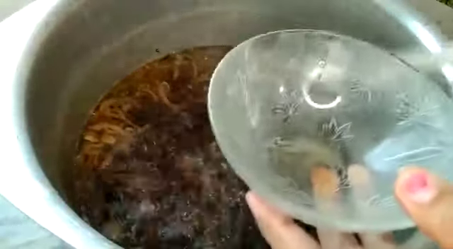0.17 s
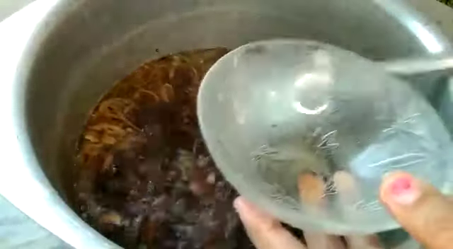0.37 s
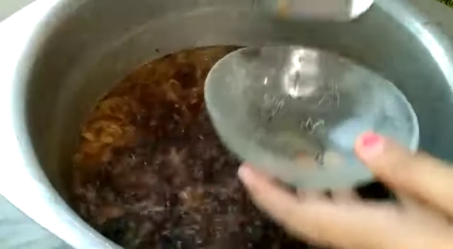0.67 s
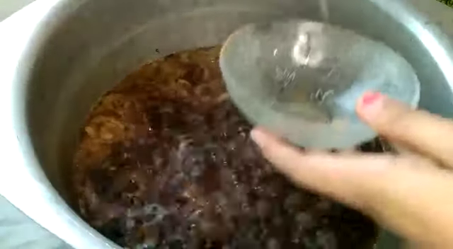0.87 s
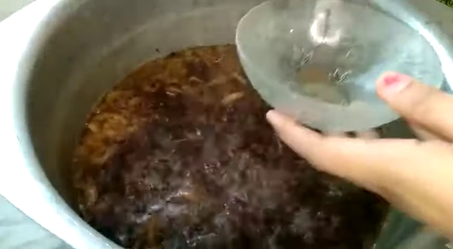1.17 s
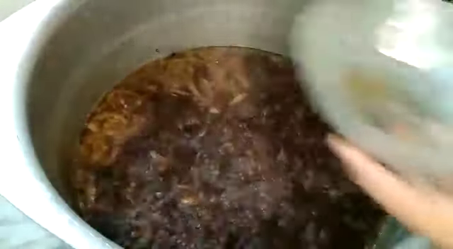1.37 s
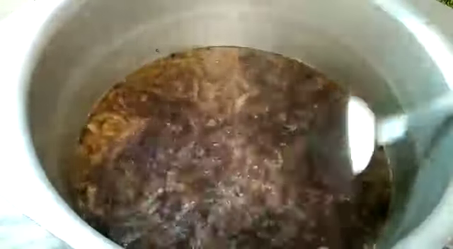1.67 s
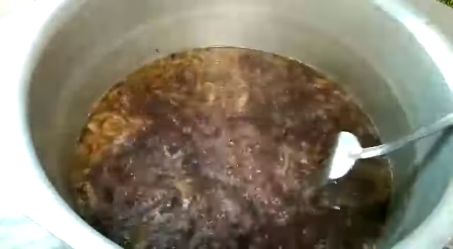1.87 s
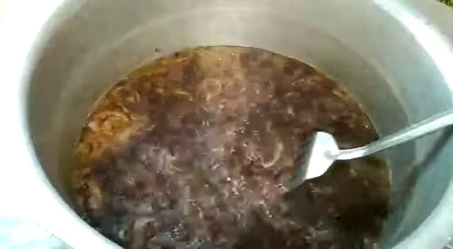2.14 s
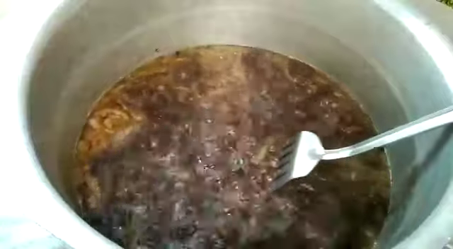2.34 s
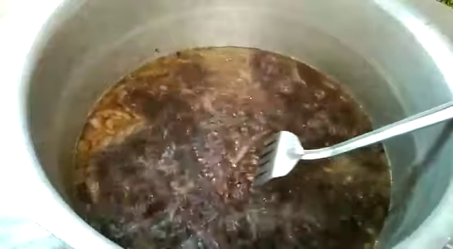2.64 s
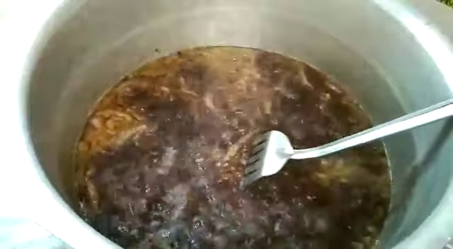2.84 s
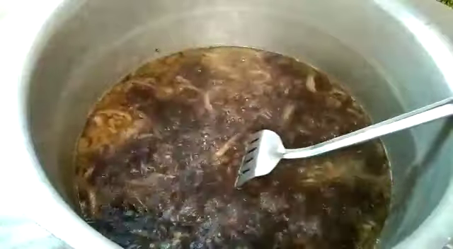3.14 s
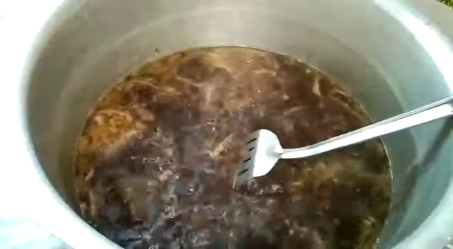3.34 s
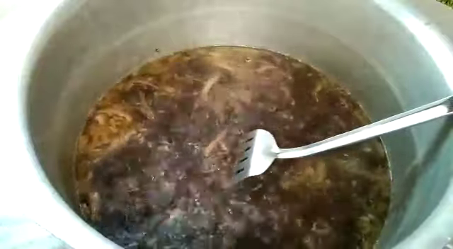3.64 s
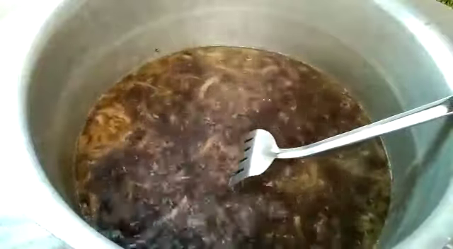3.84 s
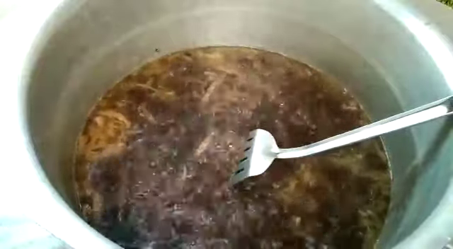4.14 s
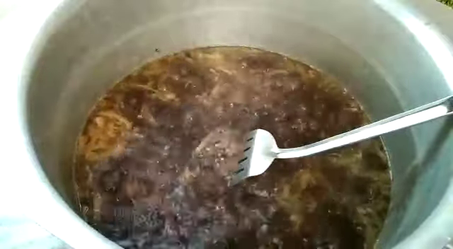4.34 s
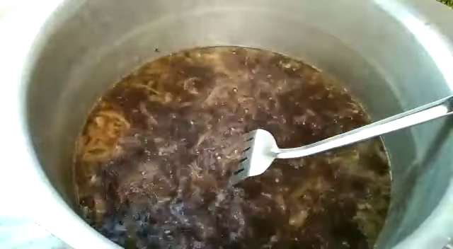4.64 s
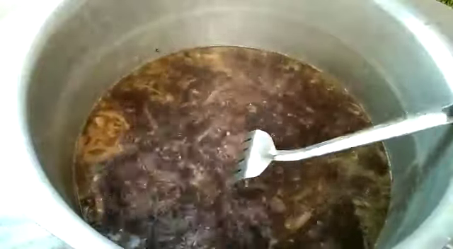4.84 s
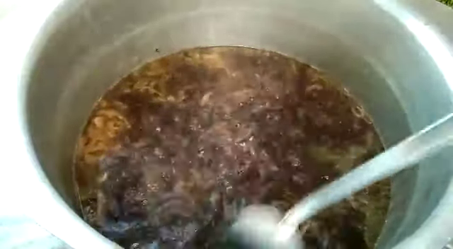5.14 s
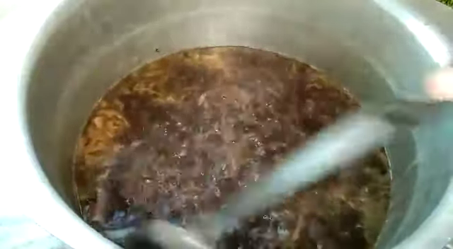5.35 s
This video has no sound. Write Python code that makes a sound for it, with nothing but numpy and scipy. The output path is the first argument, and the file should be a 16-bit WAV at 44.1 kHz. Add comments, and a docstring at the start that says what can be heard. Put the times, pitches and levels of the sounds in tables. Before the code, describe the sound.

Close metallic knocks and scrapes on a large bubbling pot in a hard-walled kitchen, with a dull double clack of glass between.

```python
"""A large metal pot simmers throughout in a hard-walled kitchen: bubble fizz on top, glugs and plops below.
A steel spatula, made of noise crashes and decaying modes, drops against the wall and slides into the stew.
Its strokes are random slips through resonances. Far peeps, falling sines, come early and again later.
A glass bowl lands with a double knock of noise and modes; a dull noise thump and a short hiss follow.
Last, the spatula is picked up, knocked and scraped round the pot."""
import sys
import numpy as np
from scipy import signal
from scipy.fft import rfft, irfft, next_fast_len
from scipy.io import wavfile
from scipy.ndimage import uniform_filter1d, map_coordinates

SR = 44100
rng = np.random.default_rng(int(sys.argv[2]) if len(sys.argv) > 2 else 0)


def file_out(sig):
    """Save sig as 16-bit WAV at sys.argv[1]."""
    # one column per channel
    cols = np.atleast_2d(sig).T
    # limit, then scale
    lim = np.clip(cols, -1, 1)
    pcm = np.round(lim * 32767).astype(np.int16)
    wavfile.write(sys.argv[1], SR, pcm)


N = 243025


def amp(db):
    """Decibels to gain."""
    return 10 ** (np.asarray(db) / 20)


def unit(x):
    """Scale to rms 1."""
    return x / np.sqrt(np.mean(x ** 2) + 1e-20)


def along(points, hz):
    """Interpolate (hz, value) points on a log frequency axis."""
    point_hz, values = np.transpose(points)
    return np.interp(np.log(hz + 1), np.log(point_hz + 1), values)


def curves(rows):
    """One value per sample for each column after the time."""
    time_s, *columns = np.transpose(rows)
    return [np.interp(np.arange(N) / SR, time_s, column) for column in columns]


def add(track, start_s, sound):
    """Mix a sound into the track at start_s."""
    part = track[max(round(start_s * SR), 0):][:len(sound)]
    part += sound[:len(part)]


def filtered(x, response):
    """Multiply the spectrum of x by a response of frequency."""
    size = next_fast_len(len(x) + 8192)
    hz = np.fft.rfftfreq(size, 1 / SR)
    return irfft(rfft(x, size) * response(hz), size)[:len(x)]


def coloured(x, spectrum):
    """Shape x by (hz, level_db) points, at rms 1."""
    return unit(filtered(x, lambda hz: amp(along(spectrum, hz))))


def struck(t, t60_s, rise_s):
    """Envelope of a blow: exponential rise and decay."""
    return amp(-60 * t / t60_s) * (1 - np.exp(-t / rise_s))


def bout(start_s, length_s, rise_s, t60_s):
    """Envelope that rises, holds until length_s after the start and dies away."""
    t = np.arange(N) / SR - start_s
    return np.clip(t / rise_s, 0, 1) * amp(-60 * np.maximum(t - length_s, 0) / t60_s)


def wobble(knots_per_s):
    """Smooth random curve through normally distributed knots."""
    knots = rng.standard_normal(256)
    return map_coordinates(knots, [np.arange(N) * knots_per_s / SR], mode="mirror")


def sparks(rate_per_s, spread_db):
    """Random one-sample impacts of uneven size, at rms 1."""
    hits = rng.random(N) < rate_per_s / SR
    sizes = rng.standard_normal(N) * amp(spread_db * rng.standard_normal(N))
    return unit(hits * sizes)


def bubbles(rate_per_s, centre_hz, spread, cycles, size_db):
    """Swarm of tiny ringing bubbles, each falling 60 dB in some cycles and rising a little in pitch."""
    count = int(rate_per_s * N / SR)
    when, pitch, size = rng.random((count, 3)).T[:, :, None]
    hz = centre_hz * np.exp(spread * (2 * pitch - 1))
    k = np.arange(int(min(2 * cycles / centre_hz, .08) * SR))
    age = hz * k / SR / cycles  # 1 at the 60 dB point
    rings = np.sin(2 * np.pi * cycles * age * (1 + .025 * age)) * struck(age, 1, .1)
    sizes = amp(-size_db * np.log(1 - .97 * size))
    places = (when * N).astype(int) + k
    return unit(np.bincount(places.ravel(), (sizes * rings).ravel(), N)[:N])


def sheet(x, count, t60_s, uneven_db):
    """Sound x through a crowd of uneven modes of thin sheet metal, at rms 1."""
    t = np.arange(SR // 6) / SR
    place, size, phase = rng.random((count, 3)).T[:, :, None]
    hz = 600 + 11000 * (np.arange(count)[:, None] + place) / count
    tones = amp(uneven_db * size) * np.sin(2 * np.pi * (hz * t + phase))
    answer = tones.sum(0) * amp(-60 * t / t60_s)
    return unit(signal.fftconvolve(x, answer)[:len(x)])


def ring(modes, t):
    """Decaying modes of new strengths each strike; phases wander at random, so the ring is slightly rough."""
    tones = np.zeros(len(t))
    for hz, level_db, t60_s in modes:
        strength = amp(level_db + 2 * rng.standard_normal() - 60 * t / t60_s)
        wander = np.cumsum(rng.standard_normal(len(t))) * np.sqrt(2 / SR) + rng.random()  # in cycles
        tones += strength * np.sin(2 * np.pi * (hz * t + wander))
    return tones * (1 - np.exp(-t / .0005))


def room(x, wet_db):
    """Add the echo of the hard walls, each frequency dying at its own speed."""
    # wall echo decay: hz, t60_s
    echo_decay = [(150, 0.68), (400, 0.49), (1200, 0.49), (3000, 0.42), (7000, 0.37), (14000, 0.5)]
    hz, t, z = signal.stft(rng.standard_normal(SR), SR, nperseg=256)
    fade = amp(-60 * t / along(echo_decay, hz)[:, None]) * (1 - np.exp(-t / 0.001))
    tail = signal.istft(z * fade, SR, nperseg=256)[1]
    return x + amp(wet_db) * signal.fftconvolve(x, tail / np.linalg.norm(tail))[:len(x)]


def spatula():
    """Steel on the pot: each contact is a crash of dense short modes, then the ring of pot and blade."""
    # contacts: start_s, level_db, body_db and bright_db (tilt before offsets), spot_hz (favoured by the spot)
    clanks = [(0.027, -42.5, -22, -31, 2320), (0.103, -37.5, -4, 3, 1110), (0.207, -38, -27, -12, 2050),
              (1.617, -53.5, 5, -9, 1293), (1.69, -11, -9, -6.5, 4310), (1.699, -27.5, -17.5, -2, 2690),
              (1.784, -12.5, -18.5, -16.5, 2310), (1.802, -16, -10.5, -9, 6530),
              (2.068, -25.5, -8.5, -17.5, 4300), (2.613, -44, -1, -1.5, 5000),
              (2.62, -37.5, -7, -2.5, 5100), (2.752, -44, -36, 5, 4970), (4.371, -50.5, -40, 7.5, 3540),
              (5.264, -26, -14, -7.5, 8260), (5.306, -11.5, -21, -8.5, 8200),
              (5.376, -17.5, -20.5, -9.5, 3075), (5.413, -17, -23.5, -1.5, 2770),
              (5.442, -13.5, -45, -14.5, 3000), (5.451, -13, -23.5, -8, 7400),
              (5.483, -11, -42, -7.5, 2880), (5.503, -16, -37, -6, 7230)]
    # modes of pot and blade: hz, level_db (before tilt), t60_s
    metal_modes = [(296, 2, .75), (345, -4, .65), (470, -6, .45), (760, -8, .5), (1281, -8, .42),
                   (1338, -3, .47), (2080, -13, .5), (2350, -3, .33), (2447, -4, .33), (2647, 0, .36),
                   (2785, -2, .33), (2975, -6, .3), (3704, -8, .35), (3965, -5, .35), (4290, -8, .25),
                   (4554, -9, .3), (4890, -8, .2), (5900, -9, .3), (6245, -8, .2), (6955, -9, .35),
                   (7185, -7, .3), (7671, -3, .15)]
    # crash colour before tilt: hz, level_db
    clang_colour = [(90, -55.5), (150, -25.5), (245, -26), (295, -4), (560, -5.5), (740, -11.5), (870, -14),
                    (1320, -7), (1730, -14), (2420, -3), (3250, -3), (4150, -2.5), (5250, -4.5),
                    (7600, -0.5), (9300, -9), (11000, -21), (15600, -25.5)]
    out, t = np.zeros(N), np.arange(SR * 3 // 4) / SR
    for start_s, level_db, body_db, bright_db, spot_hz in clanks:
        # a heavy blow moves the whole wall, a sharp corner brings out the treble
        tilt = [(600, body_db + 11.0), (2200, 0), (4500, 0), (8000, bright_db + 7.5)]

        def touch_db(hz):
            """Tilt plus the peak of the point of contact."""
            return along(tilt, hz) + 9 / (1 + ((hz / spot_hz - 1) / 0.12) ** 2)

        chatter = rng.standard_normal(len(t))
        dense = sheet(chatter, count=40, t60_s=0.02, uneven_db=11.5)
        crash = coloured(chatter + 1.1 * dense, clang_colour)
        crash = filtered(crash, lambda hz: amp(touch_db(hz)))
        # the blade snaps at once, the heavy wall swells and fades more slowly
        wall = filtered(crash, lambda hz: 1 / (1 + (hz / 1600) ** 4))
        snap = (crash - wall) * struck(t, t60_s=0.02, rise_s=0.00083)
        swell = amp(-4.5) * wall * struck(t, t60_s=0.19, rise_s=0.001)
        modes = [(hz, mode_db + touch_db(hz), t60_s) for hz, mode_db, t60_s in metal_modes]
        contact = room(snap + swell, wet_db=2.5) + amp(-25) * ring(modes, t)
        add(out, start_s, amp(level_db + 3) * contact)
    return out


def scraping():
    """The blade sticks and slips: the wall rumbles, the stirred stew gurgles, the edge rasps in resonances."""
    # strokes along the pot: start_s, length_s, wall_db, edge_db
    strokes = [(0.0, 0.014, -37.5, -48.5), (0.083, 0.16, -41.5, -46.5), (1.667, 0.028, -27.5, -29.5),
               (1.873, .11, -35.5, -33.5), (2.011, 0.04, -42, -39.5), (2.047, 0.15, -34.5, -38.5),
               (2.314, 0.056, -45, -54), (2.429, 0.066, -41.5, -52.5), (2.567, 0.14, -38.5, -51.5),
               (2.771, 0.018, -43.5, -44), (5.327, .065, -49, -28), (5.387, .115, -34, -16)]
    # colour of wall and stew: hz, level_db
    rumble_colour = [(100, -29), (200, -15.5), (290, 0), (350, 1), (460, 0.5), (610, -28.5), (770, 2.5),
                     (880, -18.5), (1100, -22.5), (1380, -4), (1750, -34), (2400, -37), (4000, -65.5)]
    # colour of the slips: hz, level_db
    rasp_colour = [(300, -25.5), (450, 1), (620, -15.5), (780, 2.5), (900, -4.5), (1250, -0.5),
                   (1750, -4.5), (2150, -21), (2700, 5), (3300, -21.5), (4300, 1.5), (7800, -1),
                   (10000, -28), (15500, -33)]
    # resonances excited by the edge: centre_hz, width_hz, level_db
    edge_modes = [(780, 25, -9), (1255, 35, -4), (2735, 50, 2), (2810, 50, 1), (3800, 70, -3),
                  (4290, 50, -7), (4778, 45, -6), (5600, 60, -9), (6430, 140, -8), (7185, 80, -2),
                  (7550, 60, -7)]
    wall, edge = np.zeros(N), np.zeros(N)
    for start_s, length_s, wall_db, edge_db in strokes:
        contact = bout(start_s, length_s, rise_s=.012, t60_s=0.18)  # takes hold, lets go
        wall += contact * amp(wall_db)
        edge += contact * amp(edge_db)

    def resonances(hz):
        """Sum of the band-pass responses."""
        return sum(amp(level_db) * 1j * hz * width_hz / (centre_hz ** 2 - hz * hz + 1j * hz * width_hz)
                   for centre_hz, width_hz, level_db in edge_modes)

    slips = sheet(sparks(rate_per_s=500, spread_db=0), count=64, t60_s=0.087, uneven_db=18)
    squeal = unit(filtered(sparks(rate_per_s=3000, spread_db=0), resonances))
    rasp = amp(-9.5) * coloured(slips, rasp_colour) + amp(-11.5) * squeal
    rumble = amp(-11) * coloured(sparks(rate_per_s=1600, spread_db=-3.5), rumble_colour)
    stew = bubbles(rate_per_s=170, centre_hz=701.5, spread=.9, cycles=38, size_db=6.5)
    gurgle = amp(-9.5) * coloured(stew, rumble_colour)
    return room(edge * rasp + wall * (rumble + gurgle), wet_db=-10)


def bowl():
    """Thick glass meets the counter: a dull clack, a tiny high ring, and a brief hum of the counter."""
    # landings, each with a bounce: start_s, level_db
    knocks = [(3.888, -14.5), (3.897, -14.5), (3.974, -12.5), (3.982, -16)]
    # clack colour: hz, level_db
    thud_colour = [(60, -57), (110, -28.5), (150, -11.5), (200, -18), (380, -6), (600, -13), (800, -5.5),
                   (1250, 4), (1650, -6), (2000, -10), (3000, -14), (4100, -40.5), (5300, -28.5),
                   (8000, -33.5), (11000, -53)]
    # glass modes: hz, level_db, t60_s
    glass_modes = [(9318, 0, .06), (11750, -16, .07), (13530, -19, .06)]
    out, t = np.zeros(N), np.arange(SR) / SR
    for start_s, level_db in knocks:
        clack = coloured(rng.standard_normal(SR), thud_colour) * struck(t, t60_s=0.044, rise_s=0.00052)
        ting = amp(-10) * room(ring(glass_modes, t), wet_db=-7.5)
        counter = amp(-22.5) * np.sin(2 * np.pi * 149 * t) * struck(t, t60_s=.5, rise_s=.004)
        add(out, start_s, amp(level_db) * (room(clack, wet_db=3.5) + ting + counter))
    return out


def thump():
    """Something heavier settles beside the bowl: a dull, slow burst of coloured noise."""
    # thump colour: hz, level_db
    thump_colour = [(90, -25), (200, -11.5), (300, 0.5), (470, -2.5), (800, -12), (1150, -8.5),
                    (1900, -21.5), (3000, -18), (4200, -31), (6300, -23), (9000, -34.5), (15000, -61.5)]
    out, t = np.zeros(N), np.arange(SR) / SR
    push = coloured(rng.standard_normal(SR), thump_colour) * struck(t, t60_s=0.22, rise_s=0.0015)
    add(out, 4.112, amp(-26.5) * room(push, wet_db=4.0))
    return out


def simmer():
    """Steam pockets glug at the bottom in bouts while tiny bubbles fizz and tinkle on top."""
    # bouts of rising steam pockets: start_s, length_s, level_db
    glug_bouts = [(0.0, 0.16, -46.5), (0.382, 0.053, -52.5), (1.124, 0.14, -54), (1.695, 0.3, -52),
                  (2.88, 0.51, -50.5), (4.34, .1, -52), (4.615, 0.071, -47), (5.006, 0.065, -53.5),
                  (5.248, 0.078, -49.5)]
    # glug colour: hz, level_db
    glug_colour = [(15, -48), (25, -8), (43, -12.5), (66, -6), (86, 7.5), (108, -7), (146, 3), (174, -14),
                   (214, -7.5), (251, -33.5), (400, -36), (520, -60.5), (880, -120)]
    # fizz strength before sway: time_s, level_db
    fizzing = [(0.0, -57), (0.15, -54), (0.43, -66.5), (0.6, -58.5), (1.35, -61.5), (1.8, -53),
               (2.3, -52.5), (3.0, -57.5), (4.4, -52), (4.97, -59), (5.5, -53)]
    # froth colour: hz, level_db
    fizz_colour = [(1470, -42.5), (2500, -30.5), (2790, -23.5), (4160, -18), (5160, -12), (5800, -36),
                   (7480, 6), (8080, -1.5), (9500, 9.5), (14900, -2), (15800, -10.5)]
    steam = amp(-64.5)  # murmur of the boil between bouts
    for start_s, length_s, level_db in glug_bouts:
        steam = steam + amp(level_db - 2.5) * bout(start_s, length_s, rise_s=.035, t60_s=0.44)
    glug = steam * coloured(sparks(rate_per_s=440, spread_db=-1.0), glug_colour)
    fizz_db = curves(fizzing)[0] + 3.16 * wobble(knots_per_s=8.2)  # the froth comes and goes
    froth = coloured(rng.standard_normal(N) + 0.75 * sparks(rate_per_s=1300, spread_db=6), fizz_colour)
    tinkle = bubbles(rate_per_s=110, centre_hz=7800, spread=.13, cycles=130, size_db=4)
    tinkle = unit(room(tinkle, wet_db=2))
    pips = bubbles(rate_per_s=20, centre_hz=5900, spread=.17, cycles=110, size_db=3.5)
    pips = unit(room(pips, wet_db=0))
    return glug + amp(fizz_db) * (amp(-2) * froth + amp(-4.0) * tinkle + amp(-16.5) * pips)


def plops():
    """A larger bursting bubble rings briefly, rising in pitch, and echoes in the pot."""
    # bursts: start_s, level_db, initial_hz
    bursts = [(0.075, -30, 950), (0.14, -28, 404), (0.645, -43.5, 1022), (0.69, -45, 573),
              (0.744, -38.5, 336), (0.76, -37.5, 808), (0.80, -30.5, 808), (0.874, -41, 1344),
              (0.919, -47, 337), (1.385, -49.5, 445), (1.619, -37, 1320), (2.226, -33, 1340),
              (2.33, -27.5, 289), (2.425, -37.5, 1180), (2.465, -37, 1315), (2.565, -28.5, 333),
              (2.683, -42.5, 897), (2.918, -44, 1338), (3.101, -42.5, 528), (3.823, -45, 1270),
              (4.484, -31.5, 272), (4.504, -47.5, 736), (4.54, -44, 1340), (5.141, -42, 727),
              (5.18, -37, 295), (5.214, -40, 713)]
    out, t = np.zeros(N), np.arange(SR // 2) / SR
    for start_s, level_db, initial_hz in bursts:
        tone = np.sin(2 * np.pi * initial_hz * (t + 3 * t * t))
        bubble = tone * struck(t, t60_s=0.053, rise_s=0.0017)
        add(out, start_s, amp(level_db - 6) * room(bubble, wet_db=0))
    return out


def sizzle():
    """A splash of broth hisses briefly on the hot wall: noise and a swarm of bubbles."""
    # hiss colour: hz, level_db
    hiss_colour = [(710, -62), (1200, -27), (1300, -13), (2030, -24), (2390, -11.5), (2850, -25.5),
                   (3950, -9), (7250, 2.5), (14000, -19.5)]
    splash = amp(-45) * bout(4.655, length_s=0.1, rise_s=0.052, t60_s=.19)
    spit = bubbles(rate_per_s=1100, centre_hz=4000, spread=1.0, cycles=59, size_db=10)
    hiss = coloured(rng.standard_normal(N) + 0.22 * spit, hiss_colour)
    return room(splash * hiss, wet_db=-4.5)


def peeps():
    """Short thin far whistles: sines that waver and fall, smeared by the walls."""
    # whistles: start_s, level_db, initial_hz (before waver)
    whistles = [(0.581, -39.5, 2377), (0.721, -39.5, 1923), (3.44, -38.5, 2436), (4.875, -37, 2450),
                (5.011, -37.5, 2044), (5.109, -44.5, 2345)]
    out, t = np.zeros(N), np.arange(SR // 2) / SR
    for start_s, level_db, initial_hz in whistles:
        waver = unit(uniform_filter1d(rng.standard_normal(len(t)), size=120))
        pitch_hz = initial_hz * (.9 + .1 * np.exp(-t / 0.26) + 0.024 * waver)
        swell = t / 0.031 * np.exp(-t / 0.02)
        whistle = swell * np.sin(2 * np.pi * np.cumsum(pitch_hz) / SR)
        add(out, start_s, amp(level_db) * room(whistle, wet_db=-5.0))
    return out


def kitchen_air():
    """Quiet air of the kitchen: steady coloured noise."""
    # air colour: hz, level_db
    air_colour = [(88, -31), (150, -4.5), (246, -8.5), (300, -3), (670, -18), (758, -16), (3610, -27.5),
                  (6000, -27), (7800, -47.5), (13200, -120)]
    return amp(-69) * coloured(rng.standard_normal(N), air_colour)


def scene():
    """Sum of all sources in the kitchen, one channel."""
    handling = spatula() + scraping() + bowl() + thump()
    pot = simmer() + plops() + sizzle()
    return (handling + pot + peeps() + kitchen_air())[None]


def record(dry):
    """The phone thins the deep bass, rounds off the highest peaks and cuts all above its band limit."""
    x = signal.sosfilt(signal.butter(2, 55, "highpass", fs=SR, output="sos"), dry[0])
    x = x / (1 + np.abs(x / .65) ** 6) ** (1 / 6)
    return filtered(x, lambda hz: hz < 15800)[None]


dry = scene()
out = record(dry)
file_out(out)
```